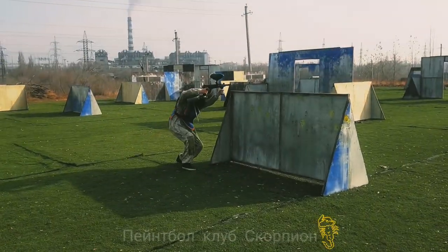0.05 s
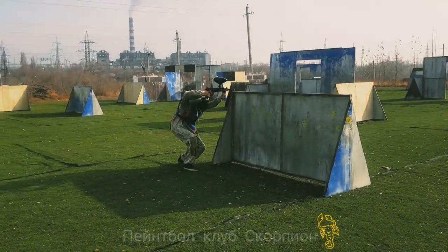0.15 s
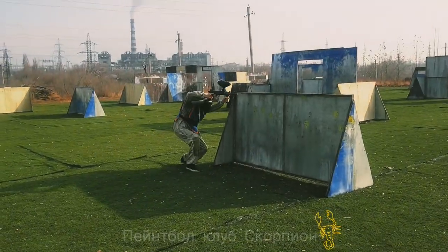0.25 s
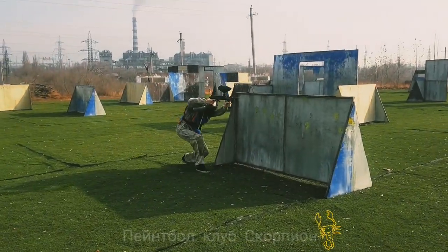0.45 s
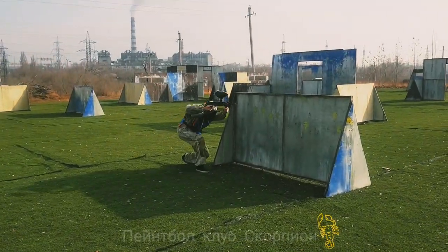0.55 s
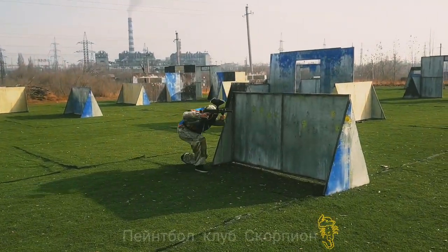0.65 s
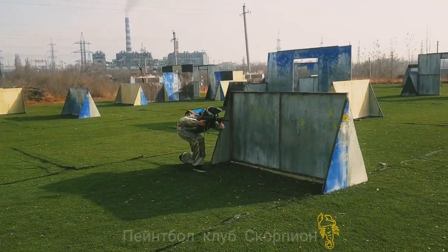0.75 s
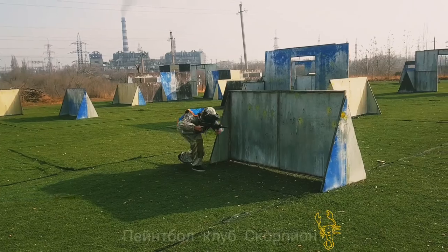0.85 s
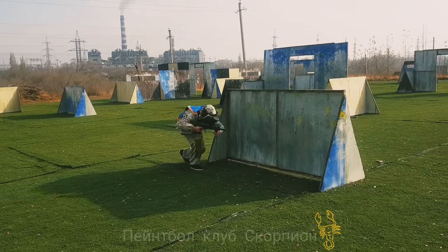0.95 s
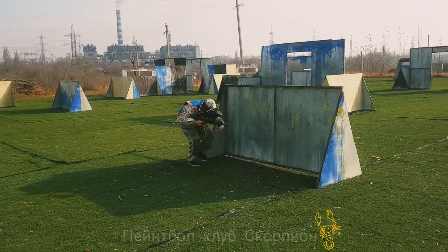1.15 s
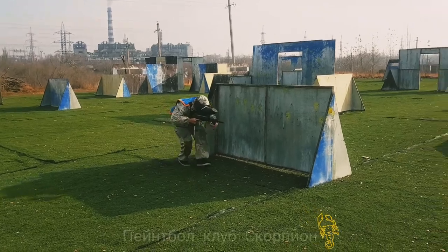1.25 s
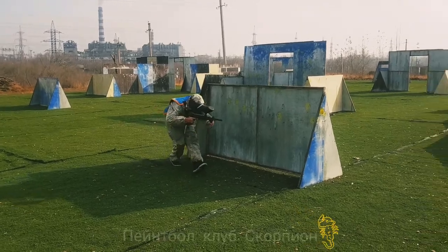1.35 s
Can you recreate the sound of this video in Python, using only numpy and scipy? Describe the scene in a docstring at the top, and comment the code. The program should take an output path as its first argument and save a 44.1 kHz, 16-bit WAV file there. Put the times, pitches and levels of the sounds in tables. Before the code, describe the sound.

A paintball marker fires twice close to the microphone, at about 0.2 and 0.3 seconds, over the fading tail of an earlier shot. Each is a sharp, hollow pop with a burst of gas and a brief metallic ring, the second softer. Their echo fades across an open field. From 0.7 to 1.3 seconds, gear ticks and clothes rustle faintly over a quiet, low rumble.

```python
"""The tail of an earlier shot is heard first, then a paintball marker fires twice on an open field.
The marker is close to the camera: each shot sums a gliding barrel hoot, a low push of air with sagging
pitch, a burst of shaped noise for the gas and decaying sines for the ringing metal parts.
Bunkers return blurred hoots and the tree line swells the decaying noise of the field.
Gear ticks and clothes rustle in bands of noise, over a low rumble, faint hiss and distant hum."""
import sys
import numpy as np
from scipy import signal
from scipy.fft import rfft, irfft
from scipy.io import wavfile
from scipy.ndimage import uniform_filter1d

SR = 44100
rng = np.random.default_rng(int(sys.argv[2]) if len(sys.argv) > 2 else 0)


def inscribe(sig):
    """Save sig as 16-bit PCM at rate SR to the path in sys.argv[1].

    A 1-D sig is mono; a 2-D sig holds one channel per row.
    Samples are clipped to [-1, 1] before scaling.
    """
    pcm = np.round(np.clip(np.atleast_2d(sig).T, -1, 1) * 32767)
    wavfile.write(sys.argv[1], SR, pcm.astype(np.int16))


N = 61739

# Shots close to the camera: (time [s], barrel and push level [dB], barrel pitch [Hz], blow length [s],
# gas level before halving [dB], gas decay t60 [s], metal level [dB], blowback level [dB],
# lag of the left port [s], level change of the gas treble [dB])
SHOTS = [(0.2036, -6, 598, 0.0047, -19, 0.042, -23, -24, -.00003, -2.5),
         (0.3205, -13.5, 705, 0.0027, -23, 0.038, -37, -43.5, .00015, -1.5)]
# Spectrum of the gas burst: (frequency [Hz], relative density [dB per Hz])
GAS_SPECTRUM = [(100, -17), (210, -16.5), (330, 6), (500, -3.5), (750, -8), (1100, -1), (1500, -5),
                (1800, -2.5), (2300, 1), (2800, -1), (3200, -5.5), (4000, -6), (4800, -5.5), (6200, -18.5),
                (8300, -26), (11500, -15), (14000, -10), (16000, -18)]
# Ringing metal parts of the marker: (frequency [Hz], relative level [dB], decay t60 [s])
METAL_MODES = [(301, -6, .07), (387, -1.5, 0.022), (1010, -0.5, 0.031), (1215, -0.5, .04), (1378, 1, .055),
               (1996, -17, .2), (2127, -8, .08), (2494, -3, 0.063), (2890, 5.5, 0.046), (3485, -16, .15),
               (3630, -11, .15), (4060, 2, 0.017), (4334, -10, 0.12), (4724, -4.5, 0.053),
               (5450, -6.5, .025)]
# Near reflections from the turf and the bunker wall: (delay [s], level [dB])
NEAR_BOUNCES = [(.0021, -14.5), (.0043, -8), (.0076, -7.5)]
# Shots whose sound spreads over the field: (time [s], level [dB])
FIELD_WASHES = [(-.18, -31), (0.2027, -34.5), (.3211, -58)]
# Sound scattered over the field:
# (frequency [Hz], relative density [dB per Hz], decay t60 [s], swell from the tree line [dB])
FIELD_BANDS = [(50, 0, 1.8, -1.5), (120, 6.5, 1.8, 2), (207.6, -8.5, 0.98, 4.5), (324, 2.5, 0.82, 7),
               (488, -5.5, 0.71, 3), (630, 0.5, 1.1, 7.5), (930, -11, 1.4, 3.5), (1620, -12, 1.3, 4.5),
               (2600, -2, .8, 4), (4540, -13, 0.95, 5.5), (6300, -17.5, 0.7, 1), (8260, -33.5, .6, 7),
               (11400, -21.5, .52, 11.5), (15500, -26.5, .5, 14.5)]
# Dull pops thrown back by bunkers: (time [s], level [dB], pitch [Hz])
BUNKER_ECHOES = [(.049, -36, 647), (.298, -31.5, 673)]
# Ticks of gear and marker parts:
# (time [s], level before panning [dB], centre [Hz], width [octaves], decay t60 [s])
GEAR_TICKS = [(0.041, -39.5, 3070, 0.42, 0.055), (0.291, -28.5, 3262, 0.38, 0.012),
              (.2938, -42, 3870, 0.25, 0.0093), (0.71, -55, 1455, 0.097, 0.054),
              (0.777, -56, 1430, 0.29, 0.033), (.806, -57, 2280, 0.21, 0.033),
              (0.835, -54.5, 930, 0.33, 0.2), (0.909, -53, 1300, 0.66, 0.1),
              (1.014, -64, 12500, 0.22, 0.018), (1.2226, -50.5, 1670, 0.45, 0.013),
              (1.2308, -58.5, 4500, 0.3, 0.022), (1.233, -54, 12700, 0.21, 0.0086),
              (1.288, -68, 1390, 0.63, 0.068)]
# Loudness of the rustling clothes: (time [s], level before panning [dB])
RUSTLE_LOUDNESS = [(0.601, -81.5), (.8, -64), (.93, -63.5), (1.059, -65), (1.11, -74.5), (1.25, -69),
                   (1.4, -84.5)]
# Spectrum of the clothes: (frequency [Hz], relative density [dB per Hz])
RUSTLE_SPECTRUM = [(200, -14.5), (600, -7.5), (850, -4), (1150, 0), (1600, -1), (2400, -12), (4500, -21.5),
                   (7000, -42), (15000, -40.5)]
# Spectrum of the steady rumble and hiss: (frequency [Hz], relative density [dB per Hz])
FLOOR_SPECTRUM = [(18, -47.5), (33, -16), (50, 3), (100, -2), (150, -10), (280, -17.5), (420, -23),
                  (600, -26.5), (1200, -44.5), (3000, -49), (8000, -63), (11500, -44), (15500, -43.5)]
# Distant hum: (frequency [Hz], rms level [dB])
HUM_TONES = [(199.2, -64.5), (398.4, -73.5)]
# The two microphone ports: (frequency [Hz], left minus right level [dB], likeness of the ports [0 to 1])
MIC_PORTS = [(60, 2, 1), (300, 4, 1), (650, 5, 0.6), (1100, 2, 0.42), (1500, 1, .35), (2100, -6.5, 0.17),
             (3000, -9, 0.069), (4700, -13, 0.089), (6300, -12, .1), (8500, -4, 0.27), (12000, -1.5, .5),
             (15500, -0.5, .6)]

BARREL_T60, BARREL_GLIDE_PER_S = 0.015, 2.8
BARREL_SECOND_DB, BARREL_THIRD_DB = -22, -29  # harmonics relative to the hoot
PUSH_DB, PUSH_HZ, PUSH_END_HZ, PUSH_SAG_S, PUSH_PEAK_S = -14, 153, 45, 0.013, 0.0051
GAS_RISE_S, GAS_HOLD_S, SPIT_DB, SPIT_T60 = 0.00099, 0.0036, 3, 0.0043
TREBLE_HZ = 8700  # the treble change applies above this
BLOWBACK_S, BLOWBACK_RISE_S, BLOWBACK_T60 = 0.012, 0.002, 0.06
METAL_SPREAD_S = 0.00033  # largest random delay at each port
WASH_RISE_S, TREES_S, TREES_WIDTH_S = 0.0013, 0.2, 0.045
SCATTER_DB = 1.5  # unevenness of the field
ECHO_RISE_S, ECHO_T60, ECHO_BLUR_DB = 0.0013, 0.039, -19.5
TICK_RISE_S = 0.0014
GEAR_PAN_DB = -5  # left minus right
FLOOR_DB = -52.5
LOW_CUT_HZ, EDGE_HZ = 36, 16100
STFT = dict(nperseg=256, noverlap=192)


def amp(db):
    """Decibels to gain."""
    return 10 ** (np.asarray(db) / 20)


def unit(x):
    """Scales to an rms of one."""
    return x / np.sqrt(np.mean(x ** 2) + 1e-20)


def read(table, hz, axis=1):
    """One column of a table, joined on a log-frequency axis."""
    rows = np.array(table)
    return np.interp(np.log(hz + 1), np.log(rows[:, 0] + 1), rows[:, axis])


def age(start):
    """Seconds since start, zero before it."""
    return np.maximum(np.arange(N) / SR - start, 0)


def envelope(t, rise, hold, t60):
    """Linear attack, then exponential release once the age passes hold."""
    release = np.exp(-np.log(1000) * np.maximum(t - hold, 0) / t60)
    return np.minimum(t / rise, 1) * release


def noise(colour):
    """Noise at both ports, partly alike in each band; colour gives dB for each frequency."""
    hz = np.fft.rfftfreq(N, 1 / SR)
    shared, differing = rfft(rng.standard_normal((2, N)))
    turn = np.arccos(np.clip(read(MIC_PORTS, hz, axis=2), -1, 1)) / 2
    left = np.cos(turn) * shared + np.sin(turn) * differing
    right = np.cos(turn) * shared - np.sin(turn) * differing
    return unit(irfft(np.array([left, right]) * amp(colour(hz)), N))


def shot(start, db, hz, blow, gas_db, gas_t60, metal_db, back_db, lag, treble_db):
    """Gas rings the barrel, pushes the air and hisses out; the bolt blows back and the metal rings."""
    t = np.array([age(start + lag / 2), age(start - lag / 2)])
    body = amp(db) * (barrel_hoot(t, hz, blow) + air_push(t))
    back = amp(back_db) * blowback(start)
    gas = gas_burst(t, blow, gas_db, gas_t60, back, treble_db)
    return body + bounced(gas) + amp(metal_db) * metal_ring(t, blow)


def barrel_hoot(t, hz, blow):
    """The barrel's air column rises in pitch for two blow lengths, then settles at hz as it decays."""
    glide = 1 + BARREL_GLIDE_PER_S * (np.minimum(t / 2, blow) - blow)
    turn = 2 * np.pi * hz * t * glide
    second = amp(BARREL_SECOND_DB) * np.sin(2 * turn)
    third = amp(BARREL_THIRD_DB) * np.sin(3 * turn)
    return (np.sin(turn) + second - third) * envelope(t, GAS_RISE_S, blow, BARREL_T60)


def air_push(t):
    """A low pulse of displaced air whose pitch sags exponentially."""
    sag = PUSH_SAG_S * (1 - np.exp(-t / PUSH_SAG_S))
    turns = PUSH_END_HZ * t + (PUSH_HZ - PUSH_END_HZ) * sag
    swell = t / PUSH_PEAK_S * np.exp(1 - t / PUSH_PEAK_S)
    return -amp(PUSH_DB) * np.sin(2 * np.pi * turns) * swell


def blowback(start):
    """Strength of the gas let out when the bolt blows back, shortly after the shot."""
    return envelope(age(start + BLOWBACK_S), BLOWBACK_RISE_S, 2 * BLOWBACK_RISE_S, BLOWBACK_T60)


def gas_burst(t, blow, gas_db, gas_t60, back, treble_db):
    """Escaping gas is turbulent noise: a hiss and a shorter spit, joined in power by the blowback."""
    hiss = envelope(t, GAS_RISE_S, GAS_HOLD_S, gas_t60)
    spit = amp(SPIT_DB) * envelope(t, blow, 1.5 * blow, SPIT_T60)
    strength = np.hypot(amp(gas_db) * (hiss + spit) / 2, back)
    return strength * noise(lambda f: read(GAS_SPECTRUM, f) + treble_db * (f > TREBLE_HZ))


def metal_ring(t, blow):
    """Metal parts ring as decaying sines, with a small random delay at each port."""
    ring = 0
    for hz, db, t60 in METAL_MODES:
        delay = METAL_SPREAD_S * rng.random((2, 1))
        turns = hz * (t - delay) + rng.random()
        ring = ring + amp(db) * envelope(t, blow, blow, t60) * np.sin(2 * np.pi * turns)
    return ring


def bounced(x):
    """Adds the first reflections, which comb the spectrum."""
    total = x
    for delay, db in NEAR_BOUNCES:
        late = np.pad(x, ((0, 0), (round(abs(delay) * SR), 0)))[:, :N]
        total = total + amp(db) * late
    return total


def echo(start, db, hz):
    """The barrel's hoot comes back from a bunker as a decaying sine blurred with noise."""
    t = age(start)
    blur = amp(ECHO_BLUR_DB) * noise(lambda f: read(FIELD_BANDS, f))
    pop = np.sin(2 * np.pi * hz * t) + blur
    return amp(db) * envelope(t, ECHO_RISE_S, ECHO_RISE_S, ECHO_T60) * pop


def field():
    """Scattered sound dies away band by band; each wash swells once as the tree line answers."""
    hz, times, bands = signal.stft(noise(lambda f: read(FIELD_BANDS, f)), SR, **STFT)
    t60 = read(FIELD_BANDS, hz, axis=2)[:, None]
    swell_db = read(FIELD_BANDS, hz, axis=3)[:, None]
    power = 0
    for start, db in FIELD_WASHES:
        t = np.maximum(times - start, 0)
        trees_db = swell_db * np.exp(-0.5 * ((t - TREES_S) / TREES_WIDTH_S) ** 2)
        power = power + (amp(db + trees_db) * envelope(t, WASH_RISE_S, 0, t60)) ** 2
    return signal.istft(bands * np.sqrt(power), SR, **STFT)[1][:, :N]


def tick(start, db, hz, octaves, t60):
    """A damped click of plastic or a buckle: a band of noise about one centre frequency."""
    def colour(f):
        widths = np.log2((f + 1) / hz) / octaves
        return -80 * np.log10(1 + widths ** 2 / 8)

    return amp(db) * envelope(age(start), TICK_RISE_S, TICK_RISE_S, t60) * noise(colour)


def rustle(grain_db=1.0):
    """Clothes rub unevenly as the player ducks: noise with a slow contour and a fine grain."""
    grain = unit(uniform_filter1d(rng.standard_normal(N), size=400))
    level_db = np.interp(age(0), *np.transpose(RUSTLE_LOUDNESS))
    return amp(level_db + grain_db * grain) * noise(lambda f: read(RUSTLE_SPECTRUM, f))


def background():
    """Low outdoor rumble and faint hiss as steady noise, with a distant hum of sines."""
    hum = 0
    for hz, db in HUM_TONES:
        turns = hz * age(0) + rng.random()
        hum = hum + amp(db) * np.sqrt(2) * np.sin(2 * np.pi * turns)
    return amp(FLOOR_DB) * noise(lambda f: read(FLOOR_SPECTRUM, f)) + hum


def scene():
    """Shots, their uneven returns, the gear leaning to the right, and the background."""
    shots = sum(shot(*row) for row in SHOTS)
    uneven = amp(SCATTER_DB * unit(uniform_filter1d(rng.standard_normal(N), size=300)))
    returns = uneven * field() + sum(echo(*row) for row in BUNKER_ECHOES)
    gear = rustle() + sum(tick(*row) for row in GEAR_TICKS)
    pan = amp(np.array([[GEAR_PAN_DB], [-GEAR_PAN_DB]]) / 2) / np.sqrt(2)
    return shots + returns + gear * pan + background()


def record(dry):
    """The right port hears more treble, the left more bass; then a low cut, full scale and band limit."""
    lean_db = read(MIC_PORTS, np.fft.rfftfreq(2 * N, 1 / SR))
    gains = amp(np.array([lean_db, -lean_db]) / 2)
    gains = gains / np.sqrt(np.mean(gains ** 2, 0))  # keeps the mean power of the two ports
    heard = irfft(rfft(dry, 2 * N) * gains)[:, :N]
    low_cut = signal.butter(4, LOW_CUT_HZ, "high", fs=SR, output="sos")
    heard = np.clip(signal.sosfilt(low_cut, heard), -1, 1)
    band_limit = signal.firwin(301, EDGE_HZ, window=("kaiser", 8), fs=SR)
    return signal.oaconvolve(heard, band_limit[None], "same")


dry = scene()
out = record(dry)
inscribe(out)
```